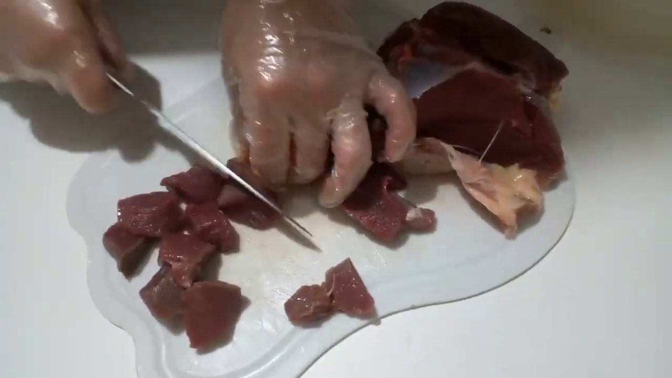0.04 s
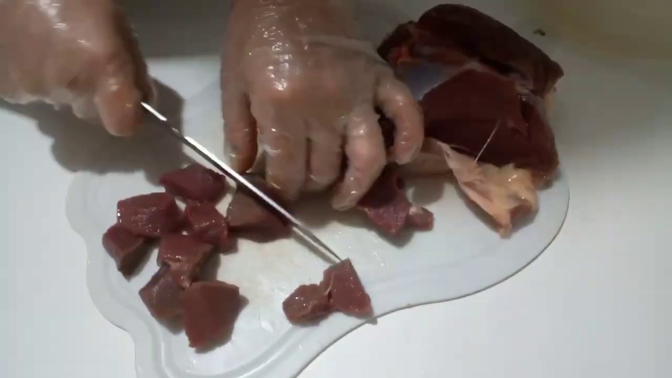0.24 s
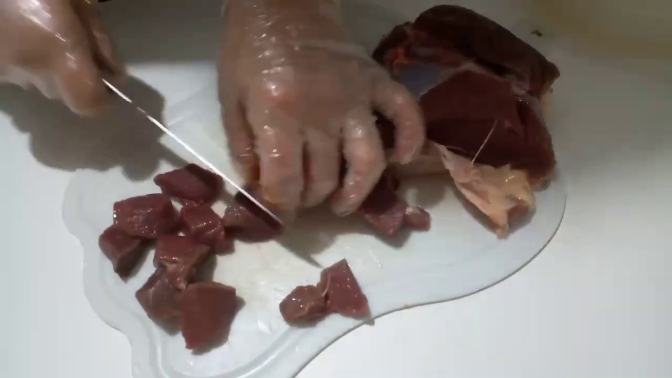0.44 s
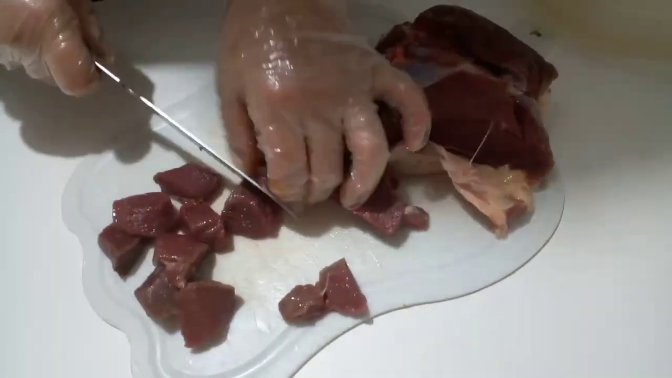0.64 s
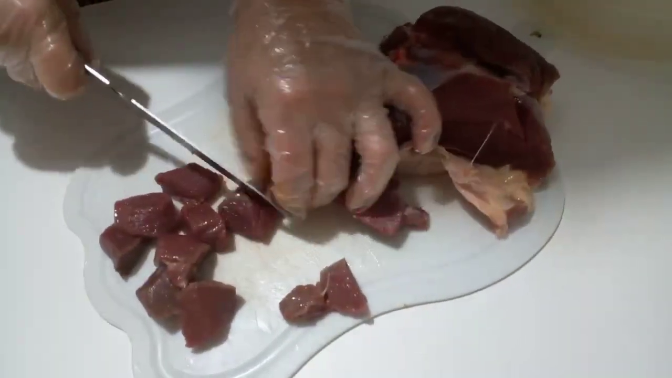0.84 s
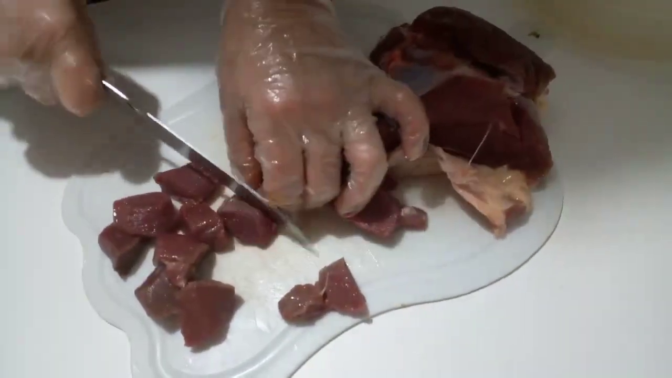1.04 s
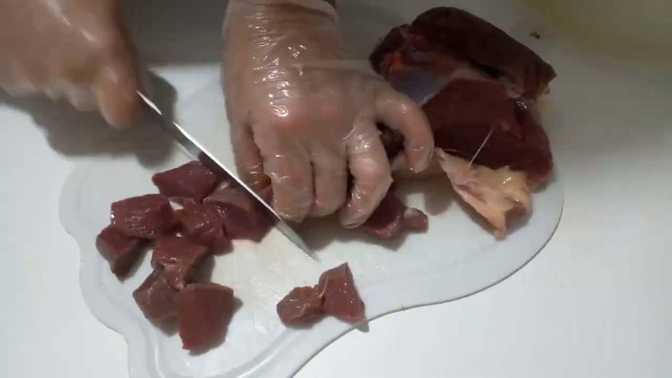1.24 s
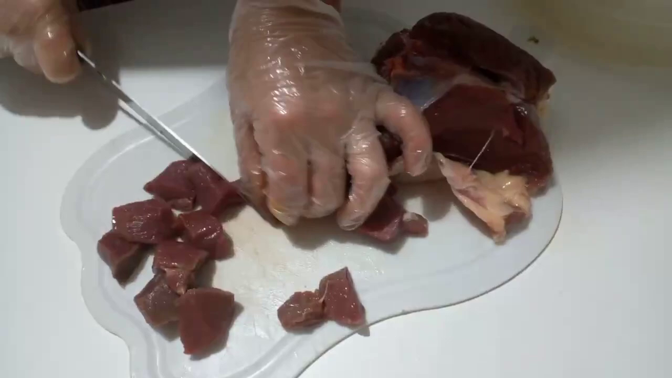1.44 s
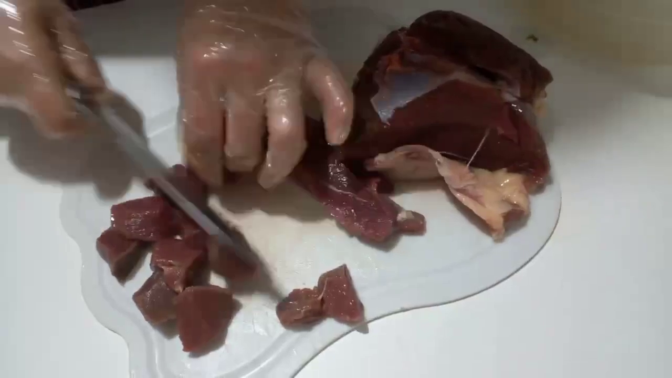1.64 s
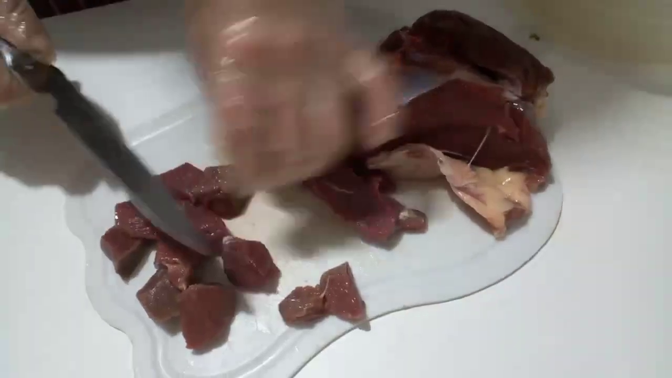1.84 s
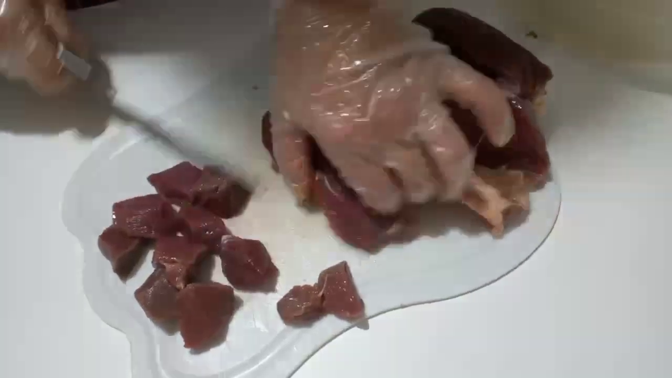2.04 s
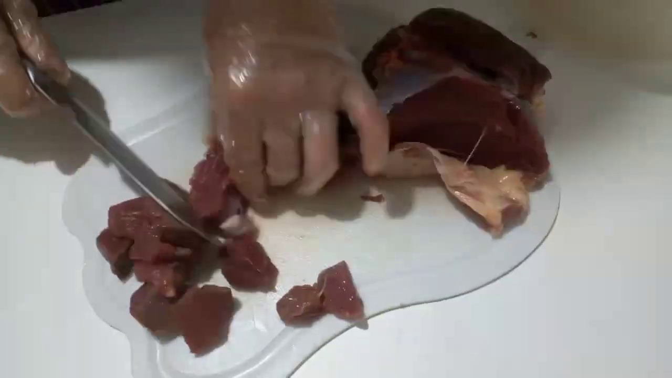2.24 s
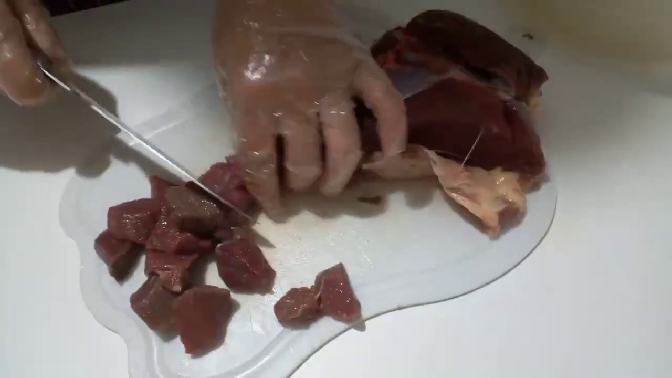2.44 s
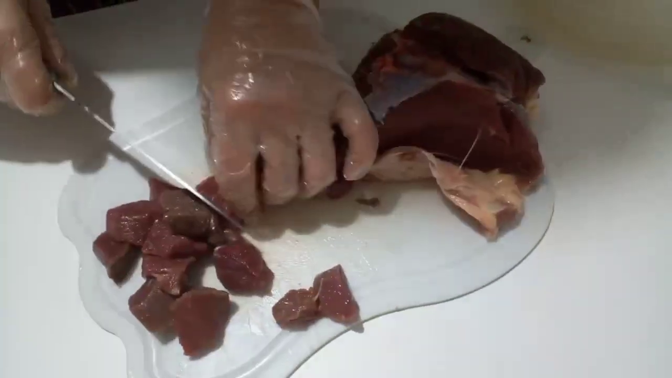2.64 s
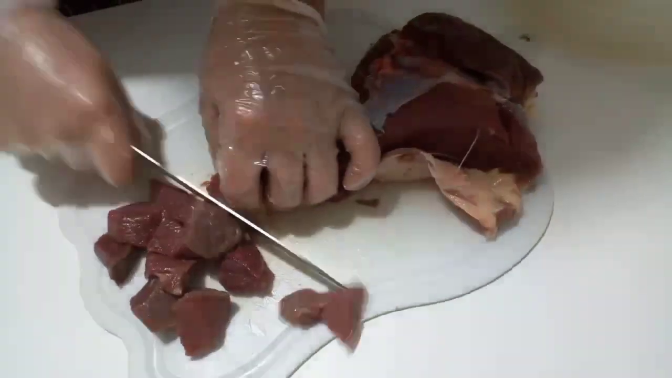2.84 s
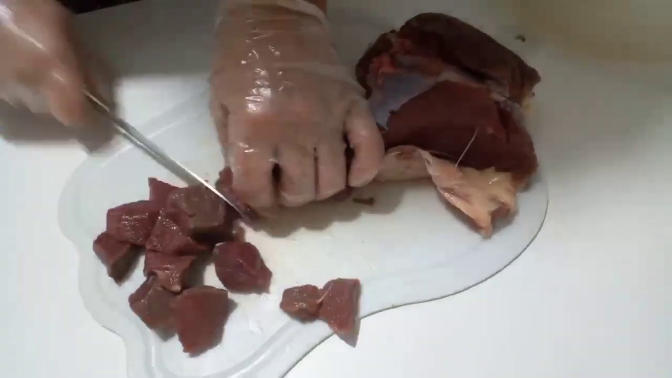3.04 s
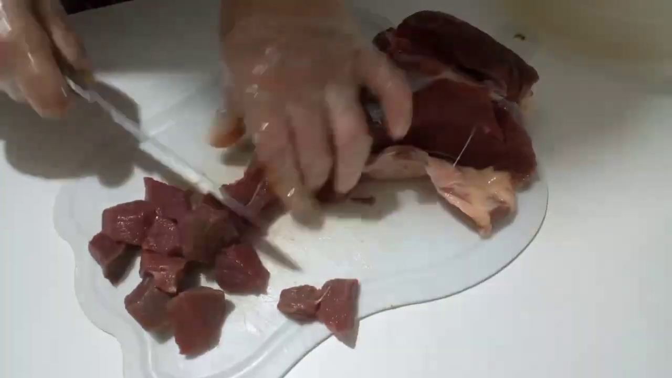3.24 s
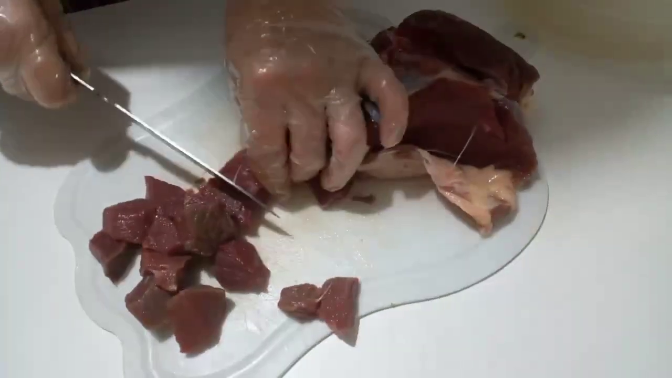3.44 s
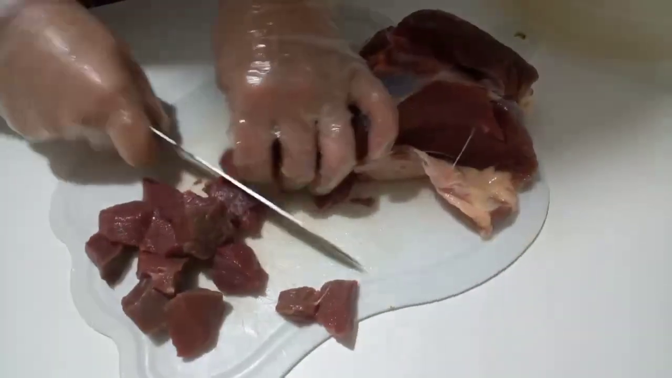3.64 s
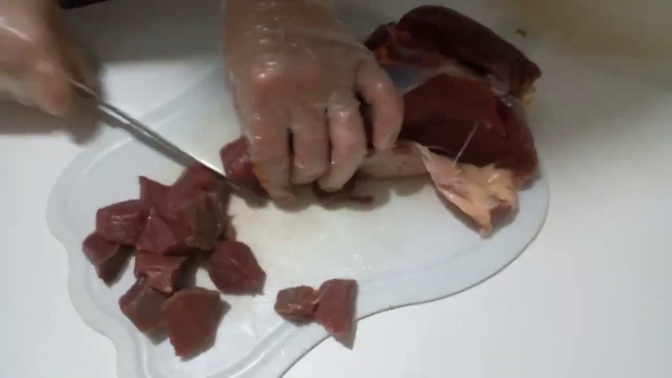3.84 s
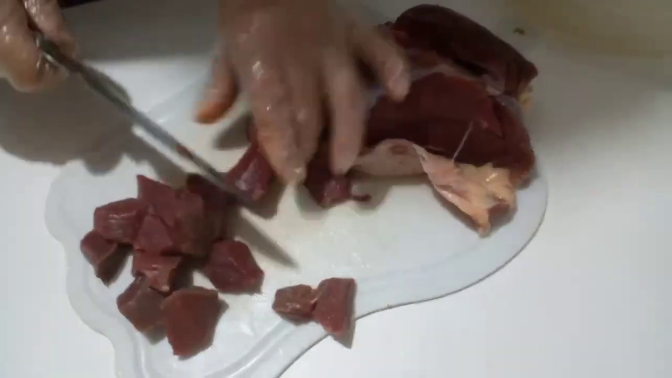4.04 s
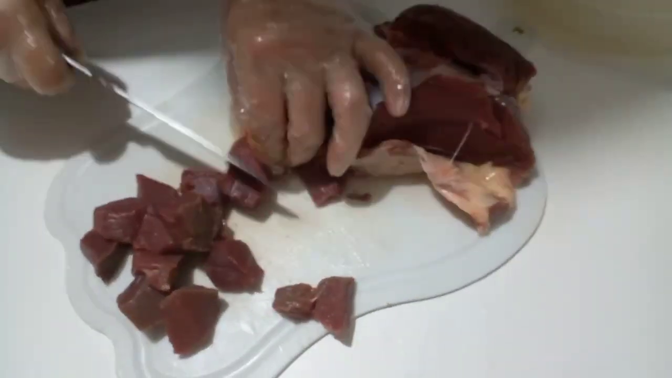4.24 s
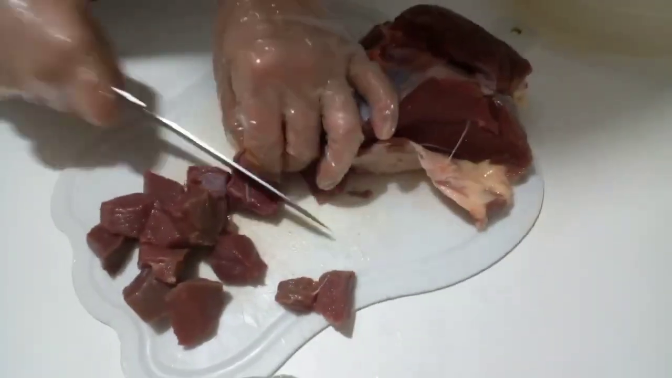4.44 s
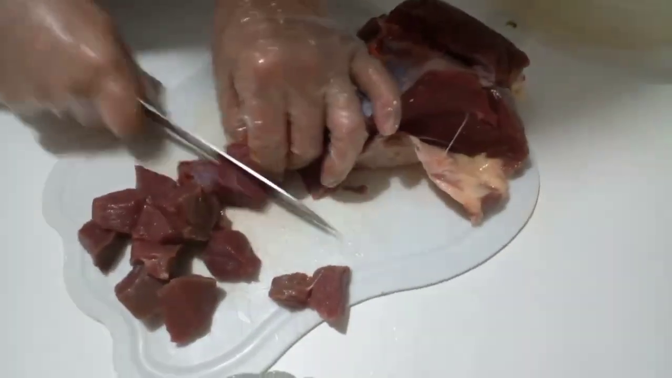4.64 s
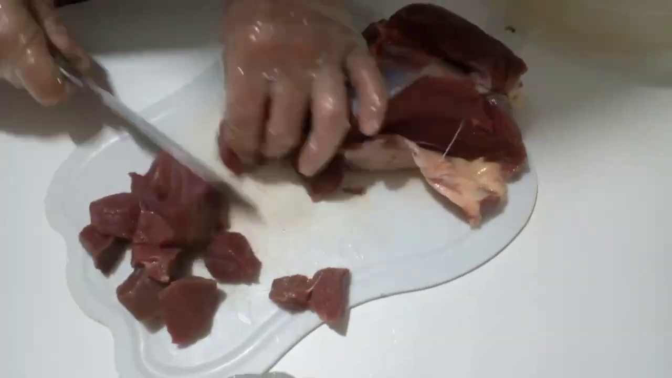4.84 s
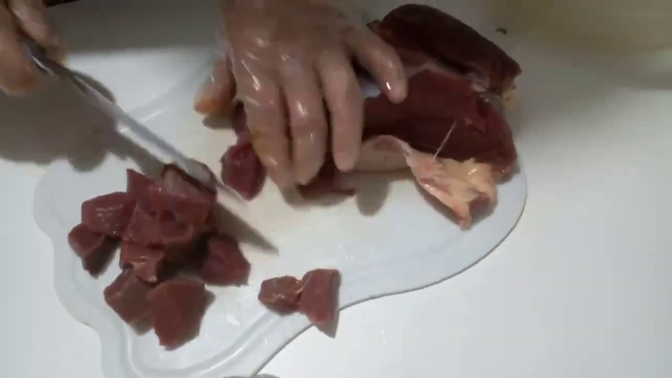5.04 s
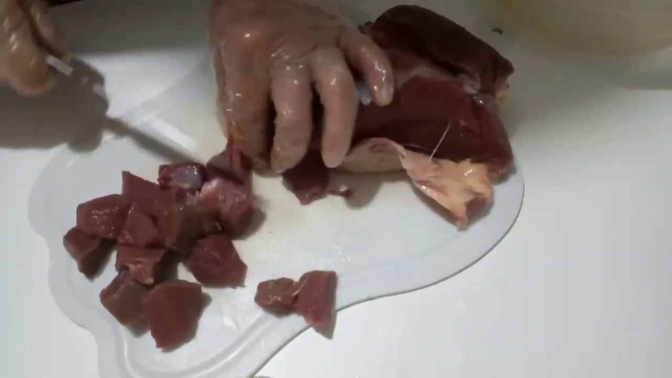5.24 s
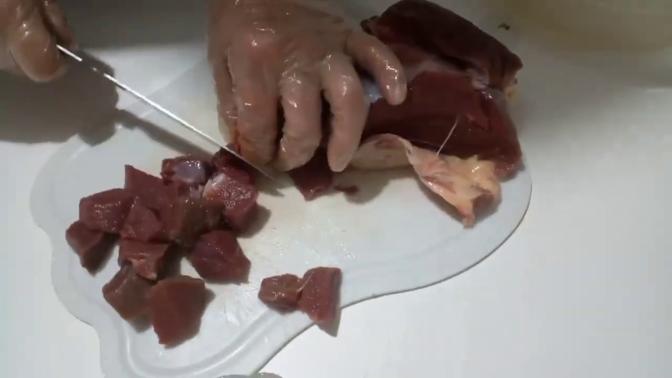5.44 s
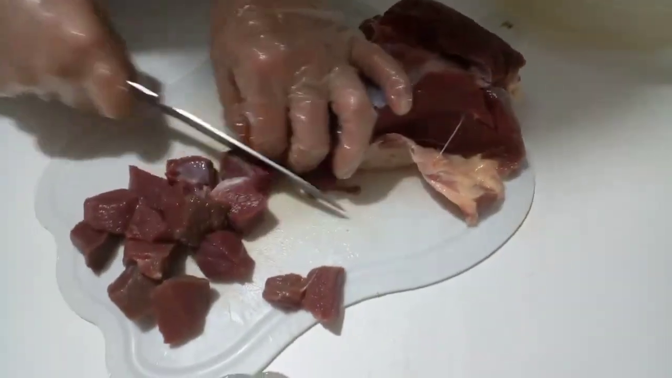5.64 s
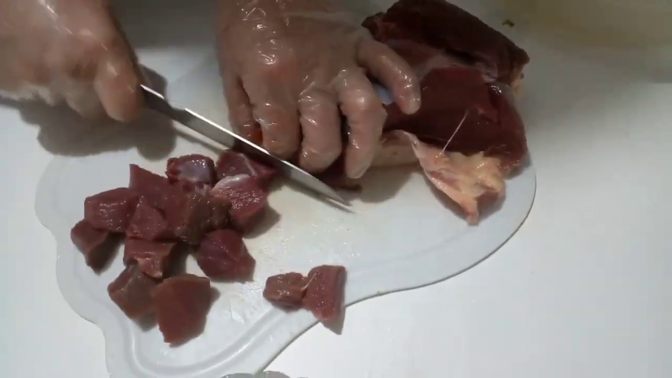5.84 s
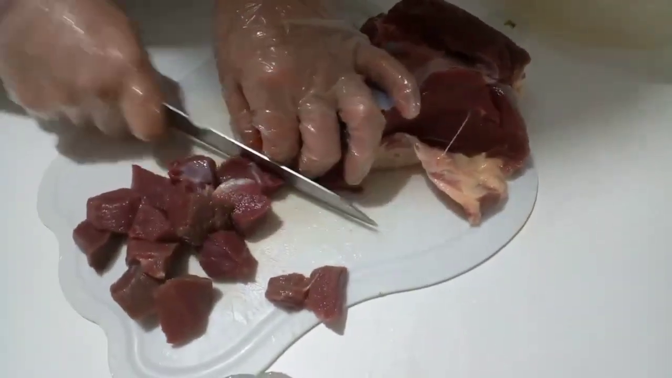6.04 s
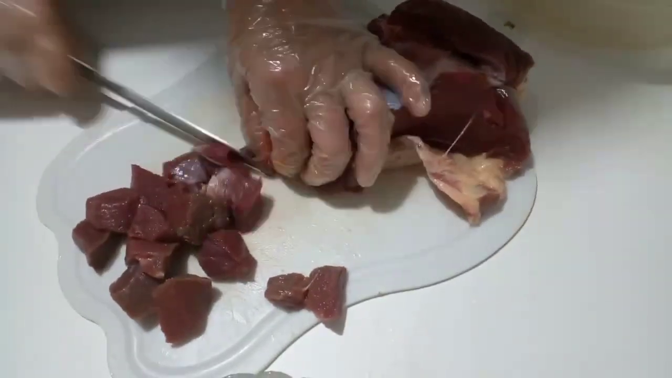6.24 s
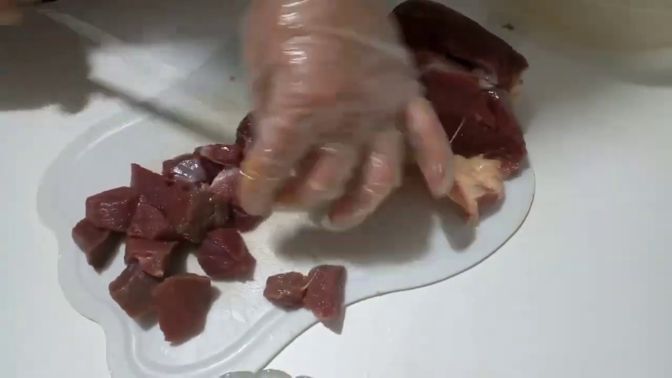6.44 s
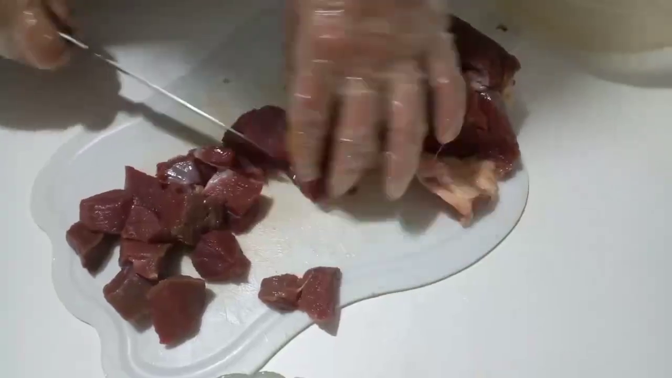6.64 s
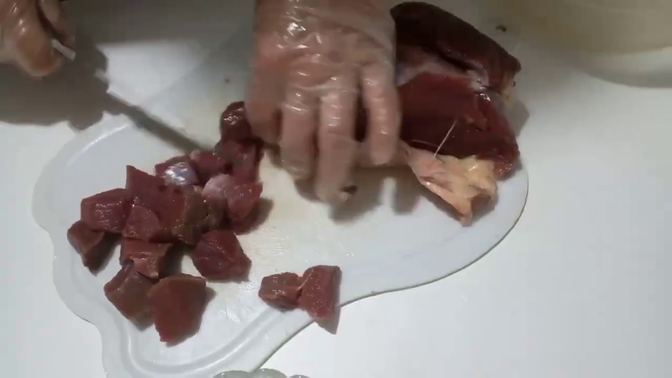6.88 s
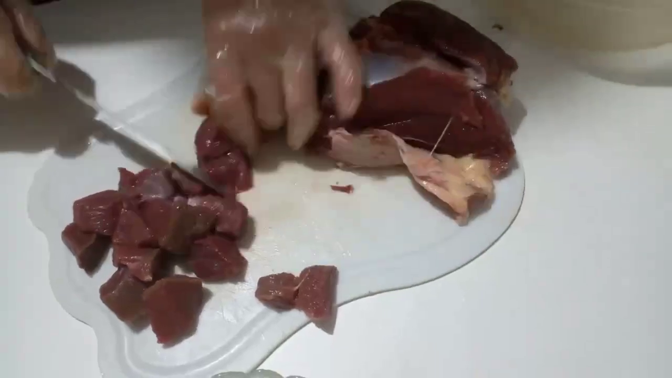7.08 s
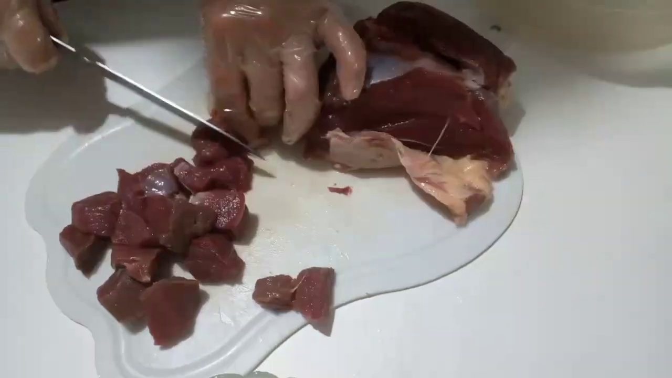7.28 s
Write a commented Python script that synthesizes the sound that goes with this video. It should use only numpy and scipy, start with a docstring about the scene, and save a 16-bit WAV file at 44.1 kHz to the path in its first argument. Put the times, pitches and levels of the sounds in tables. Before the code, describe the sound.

A faint steady appliance hum sits under soft wet squishing as a gloved hand grips raw meat. A knife cuts through it, landing on a plastic board with two softer knocks, then heavier ones, each followed by a brief dry scrape. Small sticky ticks and nudged cubes fill the gaps. Close microphone, small kitchen, nearly mono.

```python
"""A faint appliance hum and soft wet squishing open the scene: a hand works raw meat, close by.
A knife then dices it on a plastic board: noise shudders swell, and clicks and dying modes knock.
After the cuts the edge drags over the plastic: clumped noise grains rasp, and narrow noise sings.
Filtered grains make the squish, short noise bursts tick, and sparse grains snap.
Board modes and a diffuse tail of sparse reflections put it all in a small kitchen."""
import sys
import numpy as np
from scipy import signal
from scipy.fft import rfft, irfft
from scipy.io import wavfile

SR = 44100
rng = np.random.default_rng(int(sys.argv[2]) if len(sys.argv) > 2 else 0)


def store_pcm(level_fs):
    """Save levels as 16-bit WAV."""
    pcm = np.round(np.clip(level_fs, -1, 1) * 32767).astype(np.int16)
    wavfile.write(sys.argv[1], SR, np.atleast_2d(pcm).T)


N = 322371  # samples

# Table levels set the balance inside a layer; the layer's own gain may follow.

# steady background
# unsteady low lines of the hum: pitch_hz, level_db
HUM_LINES = [(102, -70), (146, -74), (247, -77.5), (592, -74), (640, -75.5)]
# colour of the quiet room noise: freq_hz, gain_db
AIR_COLOUR = [(20, -17), (45, 2), (70, 7), (100, 6), (135, 6.5), (190, -2.5), (260, 5.5), (400, 0.5),
              (580, 4), (760, -9), (1400, -20), (2600, -3.5), (5000, -11), (10000, -21.5), (13500, -12),
              (16000, -34)]
AIR_DB = -68  # level of the air between 820 Hz and 23 kHz
WHINE_HZ, WHINE_DB = 492.2, -59

# the hand bears down before the first cut: middle_s, half_length_s, level_db, low_hz, high_hz
LEAN = (-0.1, 0.54, -60.5, 110, 257)

# the hand never rests on the wet meat: squish_db, wet_fizz_db
GRIP_DB = (-73.5, -71.5)
GRIP_WAVER_DB, GRIP_PER_S = 2.5, 18
# fingers and blade shift the meat: middle_s, half_length_s, squish_db, wet_fizz_db
SQUEEZES = [(0.202, 0.061, -58, -69), (0.336, .055, -60, -67), (0.522, .03, -58.5, -62),
            (0.59, 0.062, -63, -71), (1.2, 0.019, -59, -59.5), (1.772, 0.047, -58, -65.5),
            (2.333, 0.012, -61, -66), (2.657, .03, -63, -76), (3.42, 0.044, -64, -82),
            (3.99, 0.078, -58.5, -64), (4.256, .055, -62.5, -83), (4.877, 0.014, -55, -55),
            (4.94, .06, -59.5, -67), (5.29, .04, -63, -67), (5.724, 0.064, -58, -62.5),
            (5.917, 0.06, -59, -66), (6.48, 0.017, -74.5, -67), (6.617, 0.028, -59.5, -68),
            (6.963, 0.073, -58.5, -58.5)]
# colour of the squish: freq_hz, gain_db
SQUISH_COLOUR = [(60, -7.5), (200, 5.5), (400, 2.5), (900, -11), (1500, -1.5), (2500, 3), (3300, -2.5),
                 (4300, -6.5), (6000, -9.5), (9500, -20), (13500, -11.5), (16000, -11.5)]
PRESS_DB_PER_S, LET_GO_DB_PER_S = 171, 890  # the squish swells until the edge lands, then stops
# wet ticks of meat letting go: start_s, level_db, low_hz, high_hz, decay_s (to 1/e)
TICKS = [(1.123, -54, 12000, 15500, .002), (1.717, -52, 11920, 15500, .002),
         (2.1216, -39.5, 5500, 15600, 0.002), (2.722, -46, 2600, 3100, 0.003),
         (4.214, -47.5, 2260, 5950, 0.00066), (4.4828, -51, 4060, 6580, .0015),
         (5.2382, -48, 2960, 7350, 0.00095), (5.5884, -49, 8040, 15700, 0.00072),
         (5.6563, -47.5, 2480, 14100, 0.0013), (5.9195, -51.5, 6440, 15000, 0.0019),
         (6.477, -54, 4060, 7850, 0.0017), (7.0365, -40.5, 2020, 4700, 0.0024),
         (7.061, -47.5, 2000, 3380, 0.0018), (7.118, -57, 12000, 15200, .0015)]
# the blade nudges a cube aside: start_s, level_db, length_s
NUDGES = [(1.637, -46, 0.019), (2.155, -45.5, 0.034), (3.973, -44.5, 0.017), (4.878, -56, 0.019),
          (6.939, -58.5, 0.068)]
# colour of a shoved cube: freq_hz, gain_db
NUDGE_COLOUR = [(200, 1.5), (750, -2), (1050, 7), (1550, -3), (2200, 4), (2600, -7), (3100, 0.5),
                (4000, -13), (6500, -13), (10000, -44), (16000, -22)]
# wet film breaks in tiny snaps; the follow power sets how strongly they track motion
SNAPS_PER_S, SNAP_SPREAD_DB, SNAP_DB, SNAP_FOLLOW = 70, 2.2, -74, 0.7

# the blade presses through the meat and lands on the board: start_s, crack_db, thud_db, contact_hz,
# contact_t60_s, brightness_db_per_octave, squish_db, wet_fizz_db, shudder_db
CHOPS = [(1.1796, -25, -11.5, 2040, 0.0072, -3, -51, -59.5, -49),
         (2.1193, -17.5, -14, 2030, 0.0036, 0.5, -70, -53.5, -66),
         (2.887, -6, 1, 2070, 0.0017, 0.5, -53.5, -57, -49),
         (3.6802, -5.5, 4.5, 2230, 0.005, -1, -54, -60, -37),
         (4.551, -9.5, -0.5, 2400, 0.0029, -1, -50, -59, -44),
         (6.0876, -12, -3, 2640, 0.0046, 0.5, -52, -55, -49.5)]
# colour of the crack: freq_hz, gain_db
CRACK_COLOUR = [(60, -9), (150, -27.5), (500, 9.5), (1000, -1), (1700, 9), (2700, -0.5), (3800, -1.5),
                (5700, -9), (8000, -22), (16000, -11.5)]
# blade and board ring for an instant while pressed together: pitch_hz, level_db, t60_s
CLACK_MODES = [(1540, -33.5, 0.004), (1810, 9.5, 0.0031), (3160, -13, 0.02), (4200, -24, 0.012),
               (5260, -13.5, 0.01), (7300, -18, 0.014)]
TABLE_HZ, TABLE_T60_S, TABLE_DB = 42, 0.11, -43  # the whole table gives; level relative to the thud
# the meat shudders just before it parts; the lead runs from the shudder's middle to the landing
PRESS_LEAD_S, PRESS_HALF_S, PRESS_HZ = 0.016, 0.0164, 156
# nearby walls return the thud: delay_s, gain (linear)
ECHOES = [(.0083, 0.066), (0.0133, 0.39), (0.021, 0.46), (.0267, -0.17)]
# low ringing of board, table and room: pitch_hz, level_db, t60_s
BOARD_MODES = [(138.5, 5.5, 0.14), (178.4, -4.5, 0.55), (248, 3.5, 0.51), (286.5, -4, 0.38),
               (329, 4.5, 0.17), (385, -27, 0.382), (476, -4.5, 0.48), (558, -15, 0.25), (639, -12, 0.17),
               (695, -9, 0.35), (752, -21, 0.15), (910, -17, 0.29), (1074, 6, 0.094), (1430, -23, 0.21)]
# decay of the kitchen: freq_hz, t60_s
KITCHEN_DECAY = [(100, 0.37), (300, 0.54), (1000, 0.31), (2500, 0.31), (6000, 0.21), (15000, 0.3)]

# the edge drags over the board: full_pressure_s, hold_s, bite_db_per_s, rasp_db, fine_grit_db,
# shudder_delay_s, shudder_db, shudder_hz
STROKES = [(1.32, 0.077, 300, -44.5, -48.5, 0.044, -50.5, 271),
           (1.608, 0.036, 137, -48, -51.5, .058, -60.5, 295),
           (2.176, 0.038, 200, -48, -52, 0.015, -47.5, 257),
           (3.031, 0.089, 188, -45, -51, -0.013, -50, 284),
           (3.223, 0.023, 270, -49.5, -54.5, 0.0092, -62, 278),
           (3.812, 0.079, 239, -41, -45, 0.02, -47.5, 250),
           (4.719, 0.063, 214, -43, -45, -.025, -44.5, 239),
           (6.237, 0.099, 204, -43, -44, 0.0024, -61, 275)]
# colour of the rasp: freq_hz, gain_db
RASP_COLOUR = [(290, -40), (500, -5.5), (522, -16), (988, -16.5), (1530, -11.5), (2460, -6.5), (2730, -7),
               (3810, -14.5), (5160, -13.5), (6060, -11.5), (6800, -21), (7860, -17), (10500, -27),
               (13600, -17.5), (16000, -21)]
# the blade sings faintly while it is dragged: start_s, length_s, pitch_hz, level_db
SINGS = [(1.281, 0.054, 2640, -49.5), (3.018, 0.14, 3020, -47.5), (3.192, 0.062, 2880, -51),
         (3.802, 0.035, 2660, -41.5), (3.845, 0.048, 6260, -48.5), (4.684, 0.091, 2790, -47),
         (6.201, 0.068, 2880, -46)]
SAG_DB_PER_S, LIFT_DB_PER_S = 39.5, 194  # the edge eases off, then lifts
GRIT_LAG_S, GRIT_POWER = 0.0044, 1.35  # fine grit comes later and depends more steeply on pressure
SHUDDER_HALF_S = 0.043

TOP_HZ = 15850  # the recorder's upper limit


def amp(db):
    """Turns decibels into linear gain."""
    return 10 ** (np.asarray(db) / 20)


def unit(x):
    """Scales to rms 1."""
    return x / np.sqrt(np.mean(x ** 2) + 1e-20)


def read(points, hz):
    """Reads a table on a log-frequency axis."""
    freq_hz, value = np.transpose(points)
    return np.interp(np.log(hz + 1), np.log(freq_hz + 1), value)


def add(mix, s, sound):
    """Lays a sound into the mix at time s."""
    part = mix[max(round(s * SR), 0):][:len(sound)]
    part += sound[:len(part)]


def colour(x, points):
    """Filters by a spectrum, without shifting phase."""
    hz = np.fft.rfftfreq(len(x), 1 / SR)
    return irfft(rfft(x) * amp(read(points, hz)), len(x))


def band(x, lo_hz, hi_hz, order=3):
    """Causal band-pass."""
    edges = [lo_hz, min(hi_hz, SR / 2 - 1)]
    return signal.sosfilt(signal.butter(order, edges, "band", fs=SR, output="sos"), x + 1e-18)


def drift(per_s):
    """Smooth random motion of rms 1."""
    smoothing = np.exp(-(np.fft.rfftfreq(N, 1 / SR) / per_s) ** 2)
    return unit(irfft(rfft(rng.standard_normal(N)) * smoothing, N))


def grains(per_s, spread_db):
    """Countless tiny slips of uneven size, at random instants."""
    size = amp(spread_db * np.minimum(rng.exponential(1, N), 4))
    struck = rng.random(N) < per_s / SR
    return unit(size * rng.standard_normal(N) * struck)


def swell(s, half_s):
    """A bell-shaped gain around time s, down to 1/e at half_s on either side."""
    away, gain = np.arange(N) / SR - s, np.zeros(N)
    near = abs(away) < 4 * half_s
    gain[near] = np.exp(-(away[near] / half_s) ** 2)
    return gain


def ramp(s, hold, rise_db_per_s, sag_db_per_s, fall_db_per_s):
    """A gain that rises to 1 at time s, sags while held, then falls."""
    t, gain = np.arange(-SR // 2, SR // 2) / SR, np.zeros(N)
    rise = rise_db_per_s * np.minimum(t, 0)
    sag = sag_db_per_s * np.clip(t, 0, hold)
    fall = fall_db_per_s * np.maximum(t - hold, 0)
    add(gain, s + t[0], amp(rise - sag - fall))
    return gain


def ring(hz, t60):
    """One dying mode that swells over its first half cycle."""
    t = np.arange(int(SR * t60) + 2) / SR
    decay = np.exp(-np.log(1000) * t / t60)
    onset = np.sin(np.pi * np.minimum(hz * t, .5)) ** 2
    return np.sin(2 * np.pi * hz * t) * decay * onset


def click(points, tilt_db, size=2048):
    """A causal impulse with the given spectrum, tilted about 2 kHz in dB per octave."""
    hz = abs(np.fft.fftfreq(size, 1 / SR))
    tilt = tilt_db * np.log2(np.maximum(hz, 500) / 2000)
    log_gain = np.log(amp(read(points, hz) + tilt))
    # minimum phase packs the energy right at the onset
    return np.fft.ifft(np.exp(np.conj(signal.hilbert(log_gain)))).real


def friction(gains, drive, points):
    """Coarse slips fill the middle and fine ones the treble, each at its own level."""
    sound = colour(drive, points)
    fine = colour(sound, [(4000, -40), (5000, 0)])
    return unit(sound - fine) * gains[0] + unit(fine) * gains[1]


def board(force):
    """Board, table and room ring on after any push, as a sum of dying modes."""
    response = np.zeros(SR)
    for hz, db, t60 in BOARD_MODES:
        add(response, 0, amp(db) * ring(hz, t60))
    return signal.oaconvolve(force, response / np.linalg.norm(response))[:N]


def kitchen(x):
    """A diffuse tail of sparse reflections, each band dying at its own speed."""
    taps = rng.choice([-1., 1.], SR) * (rng.random(SR) < 5000 / SR)
    hz, t, spectrum = signal.stft(taps, SR, nperseg=256)
    decay = np.exp(-np.log(1000) * t / read(KITCHEN_DECAY, hz)[:, None])
    onset = 1 - np.exp(-t / 0.00033)
    tail = signal.istft(spectrum * decay * onset, SR, nperseg=256)[1]
    return signal.oaconvolve(x, tail / np.linalg.norm(tail))[:N]


def background():
    """An appliance whines over wavering low lines and quiet room noise."""
    t = np.arange(N) / SR
    whine_level = amp(WHINE_DB + 0.13 * drift(39))
    whine = whine_level * unit(np.sin(2 * np.pi * WHINE_HZ * t + 0.13 * drift(1.2)))
    hum = np.zeros(N)
    for hz, db in HUM_LINES:
        waver = drift(4.5) + 1j * drift(2.3) + 1.5  # moves both level and phase
        hum += amp(db) * unit((waver * np.exp(2j * np.pi * hz * t)).real)
    air = colour(rng.standard_normal(N), AIR_COLOUR)
    return whine + hum + amp(AIR_DB) * air / np.std(band(air, 820, 23000))


def leaning():
    """A dull rumble of low noise as the hand settles its weight on the meat."""
    s, half_s, db, lo_hz, hi_hz = LEAN
    return amp(db) * swell(s, half_s) * unit(band(rng.standard_normal(N), lo_hz, hi_hz, order=2))


def squeezing():
    """Gains of squish and wet fizz: a restless grip, single squeezes, and the press before each chop."""
    moves = [(GRIP_DB, amp(GRIP_WAVER_DB * drift(GRIP_PER_S)))]
    for s, half_s, squish_db, fizz_db in SQUEEZES:
        moves.append(((squish_db, fizz_db), swell(s, half_s)))
    for s, *_, squish_db, fizz_db, _ in CHOPS:
        press = ramp(s, 0, PRESS_DB_PER_S, 0, LET_GO_DB_PER_S)
        moves.append(((squish_db, fizz_db), press))
    # separate moves add as powers
    return np.sqrt(sum(np.outer(amp(dbs), gain) ** 2 for dbs, gain in moves))


def ticks():
    """Meat lets go in short band-limited noise bursts that die exponentially."""
    out = np.zeros(N)
    for s, db, lo_hz, hi_hz, decay in TICKS:
        fade = np.exp(-np.arange(SR // 40) / (decay * SR))
        burst = band(rng.standard_normal(len(fade)) * fade, lo_hz, hi_hz, order=2)
        add(out, s, amp(db) * burst * np.linalg.norm(fade) / np.linalg.norm(burst))
    return out


def nudges():
    """Cubes shoved along the board scuff in brief stretches of coloured grains."""
    out = np.zeros(N)
    shove = unit(colour(grains(3600, 5.4), NUDGE_COLOUR))
    for s, db, length in NUDGES:
        part = unit(shove[int(s * SR):][:int(length * SR)])
        add(out, s, amp(db) * part * signal.windows.tukey(len(part), .4))
    return out


def meat(gains):
    """Soft squishes of clumped slips, with ticks and nudges, bump the board and fill the room."""
    squish = amp(-1.5) * friction(gains, grains(2500, 1.3) * amp(2 * drift(45)), SQUISH_COLOUR)
    wet = squish + ticks() + nudges()
    bumps = gains[0] * unit(board(band(grains(350, 2.1), 163, 610, order=2)))
    return wet + amp(-5) * kitchen(wet) + amp(-22.0) * bumps


def snaps(wetness):
    """Wet film breaks in sparse sticky crackles, stronger as blade or fingers move."""
    motion = wetness ** SNAP_FOLLOW
    crackle = unit(band(grains(SNAPS_PER_S, SNAP_SPREAD_DB) * motion, 8000, 16000, order=1))
    return amp(SNAP_DB) * (crackle + kitchen(crackle))


def shudders():
    """Sinew gives way in small jerks that shake the board, before each chop and around each stroke."""
    t, out = np.arange(N) / SR, np.zeros(N)
    jerks = board(grains(980, 1))
    presses = [(s - PRESS_LEAD_S, PRESS_HALF_S, db, PRESS_HZ) for s, *_, db in CHOPS]
    drags = [(s + delay, SHUDDER_HALF_S, db, hz) for s, *_, delay, db, hz in STROKES]
    for s, half_s, db, hz in presses + drags:
        near = abs(t - s) < 2.5 * half_s
        thrum = unit(band(jerks, hz * 0.988, hz * 1.29, order=2)[near])
        out[near] += amp(db) * thrum * swell(s, half_s)[near]
    return out


def chops():
    """The blade cracks on the plastic and thumps the table; walls and room answer."""
    cracks, thuds, wetness, walls, sway = np.zeros((5, N))
    t = np.arange(N) / SR
    for s, crack_db, thud_db, hz, t60, bright_db, *_ in CHOPS:
        add(cracks, s, -amp(crack_db + 12.5) * click(CRACK_COLOUR, bright_db))
        add(cracks, s, -amp(crack_db - 2.5) * ring(hz, t60))
        # neighbouring modes of the contact swing against each other
        for k, (mode_hz, db, mode_t60) in enumerate(CLACK_MODES):
            gain = amp(crack_db + db - 12.5 + bright_db * np.log2(mode_hz / 2000))
            add(cracks, s + 0.00022, (-1) ** k * gain * ring(mode_hz, mode_t60))
        add(thuds, s, amp(thud_db - 7) * ring(282.0, 0.0097))
        add(thuds, s, amp(thud_db - 22) * ring(138, 0.028))  # the table under the board
        add(sway, s, amp(thud_db + TABLE_DB) * ring(TABLE_HZ, TABLE_T60_S))
        # fibres snap just before the edge lands, and juice sprays after it
        fade_s = np.where(t < s, 0.0027, 0.047)
        wetness += amp(crack_db) * np.exp(-abs(t - s) / fade_s)
    # the treble comes late as the edge bites in: up to 1.4 ms, reached at 5 kHz
    lag = .0014 * np.minimum(np.fft.rfftfreq(N, 1 / SR) / 5000, 1) ** 1.5
    cracks = irfft(rfft(cracks) * np.exp(-2j * np.pi * np.cumsum(lag) * SR / N), N)
    # the soft plastic rounds off the blow
    cracks = band(cracks, 120, 7000, order=3)
    thuds = band(thuds, 112, 1500, order=4)
    for delay, gain in ECHOES:
        add(walls, delay, gain * thuds)
    juice = amp(-45.5) * wetness * unit(band(grains(5100, 1.1), 3100, 20000))
    body = board(amp(-20.5) * thuds + amp(-14.5) * cracks)
    # the room is diffuse mostly above its low modes
    room_feed = band(cracks, 466, 14000, order=2) + amp(-1.5) * band(thuds, 130, 830, order=2)
    return cracks + thuds + sway + walls + juice + body + amp(-2.5) * kitchen(room_feed)


def dragging():
    """Gains of coarse rasp and fine grit: both follow the pressure of each stroke."""
    coarse, fine = np.zeros((2, N))
    for s, hold, bite_db_per_s, rasp_db, grit_db, *_ in STROKES:
        pressure = ramp(s, hold, bite_db_per_s, SAG_DB_PER_S, LIFT_DB_PER_S)
        coarse += amp(rasp_db) * pressure
        add(fine, GRIT_LAG_S, amp(grit_db) * pressure ** GRIT_POWER)
    return coarse, fine


def scrapes(gains):
    """The edge sticks and slips in clumps over the scored plastic, which rumbles under it."""
    rasp = friction(gains, grains(14000, 0.27) * amp(2.2 * drift(62)), RASP_COLOUR)
    # each patch of the cut has its own colour
    middle = 0.31 * band(rasp, 1220, 2900, order=1) * drift(5.7)
    treble = 0.079 * band(rasp, 4800, 10500, order=1) * drift(27)
    rasp = rasp + middle + treble
    for s, length, hz, db in SINGS:
        noise = rng.standard_normal(int(length * SR))
        tone = unit(band(noise, hz * .95, hz * 1.05, order=2))
        add(rasp, s, amp(db) * tone * signal.windows.tukey(len(tone), .5))
    rumble = gains[0] * unit(board(band(grains(2300, 2.7), 240, 1200, order=2)))
    return amp(-2.5) * rasp + amp(-17.5) * rumble + amp(-16.0) * kitchen(rasp)


def scene():
    """Everything is central; only a trace of treble hiss sits opposed between the ears."""
    side = amp(-86.5) * unit(band(rng.standard_normal(N), 7240, 12500, order=2))
    squeeze, drag = squeezing(), dragging()
    hand = leaning() + meat(squeeze) + snaps(drag[1] + squeeze[1])
    knife = shudders() + chops() + scrapes(drag)
    return background() + hand + knife + np.array([side, -side])


def record(dry):
    """The recorder's band limit: a steep low-pass at TOP_HZ."""
    lowpass = signal.firwin(511, TOP_HZ, window=("kaiser", 8), fs=SR)
    return signal.oaconvolve(dry, lowpass[None], "same", axes=1)


dry = scene()
out = record(dry)
store_pcm(out)
```